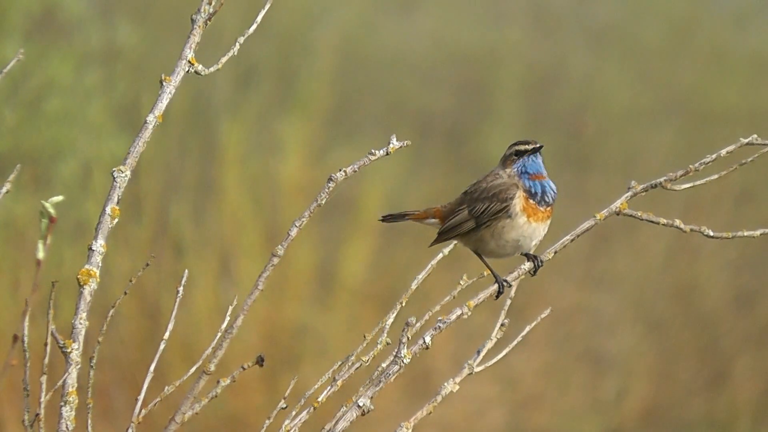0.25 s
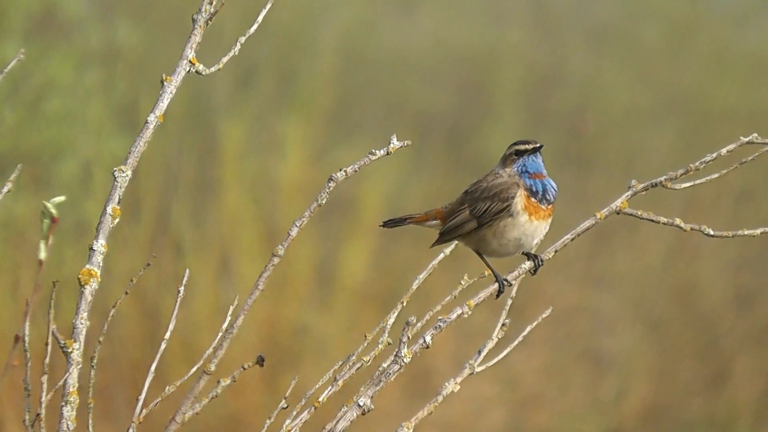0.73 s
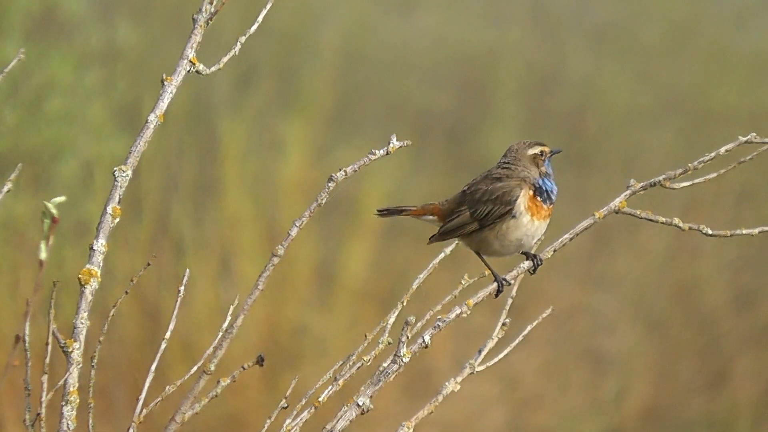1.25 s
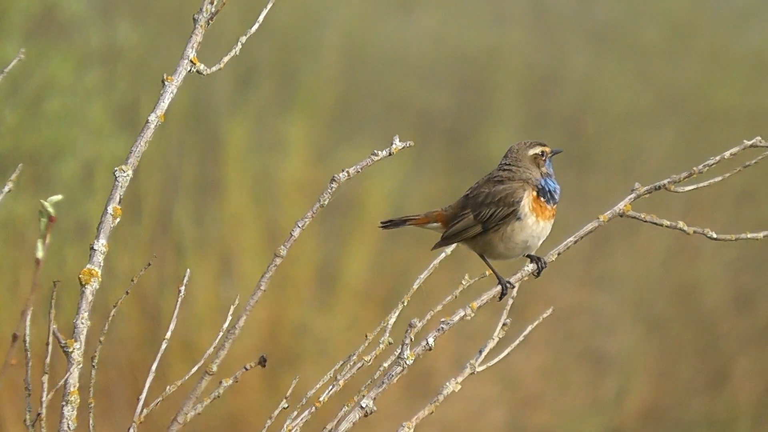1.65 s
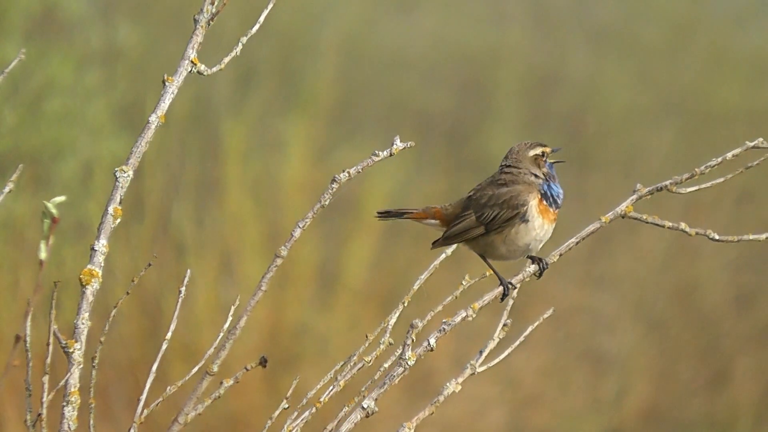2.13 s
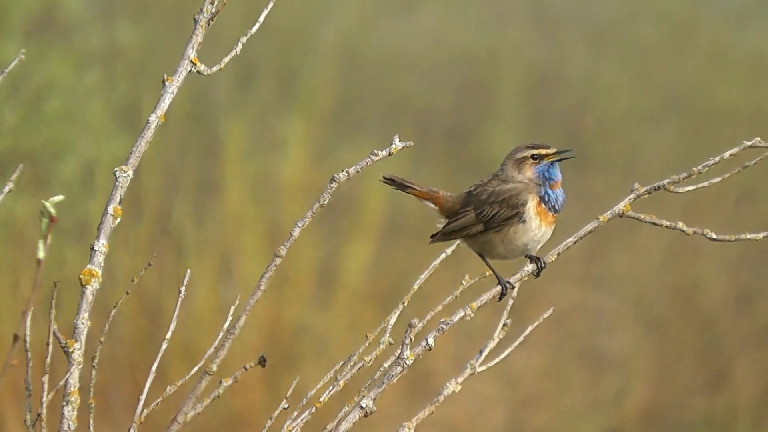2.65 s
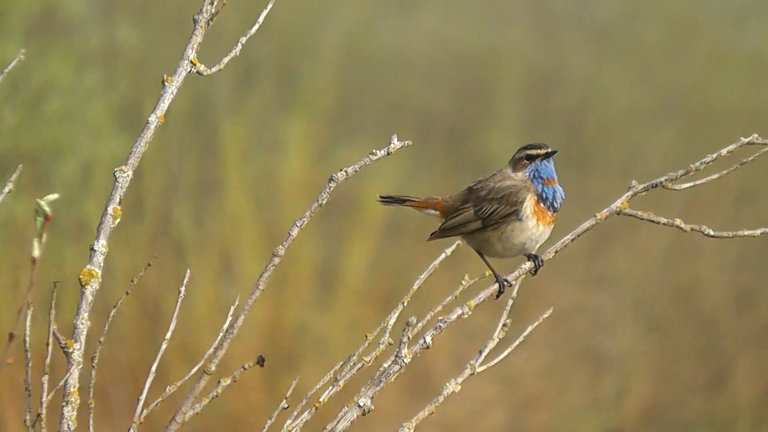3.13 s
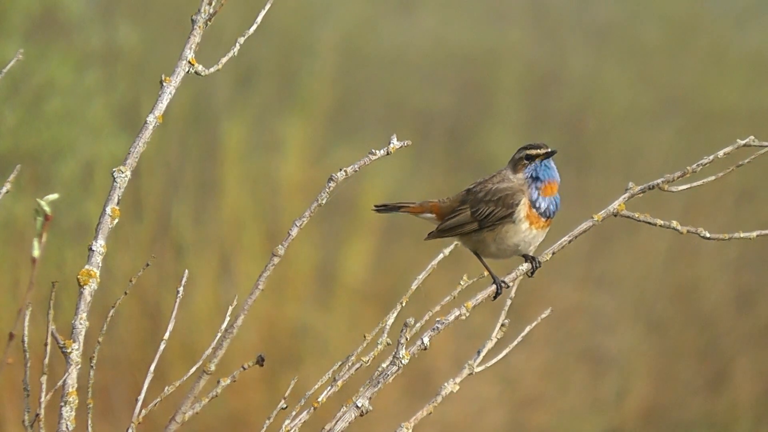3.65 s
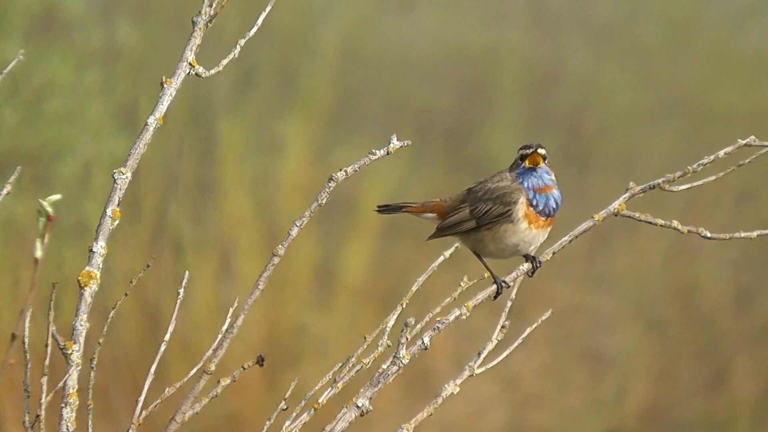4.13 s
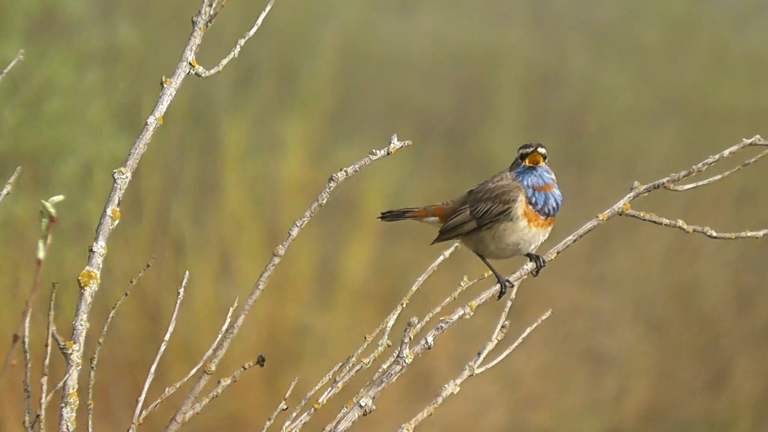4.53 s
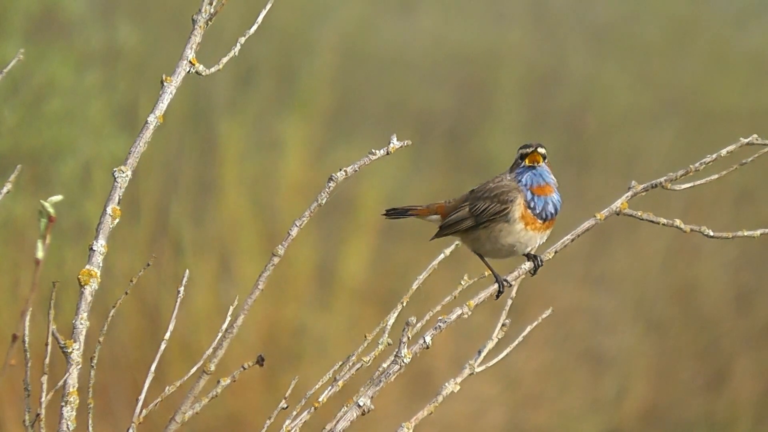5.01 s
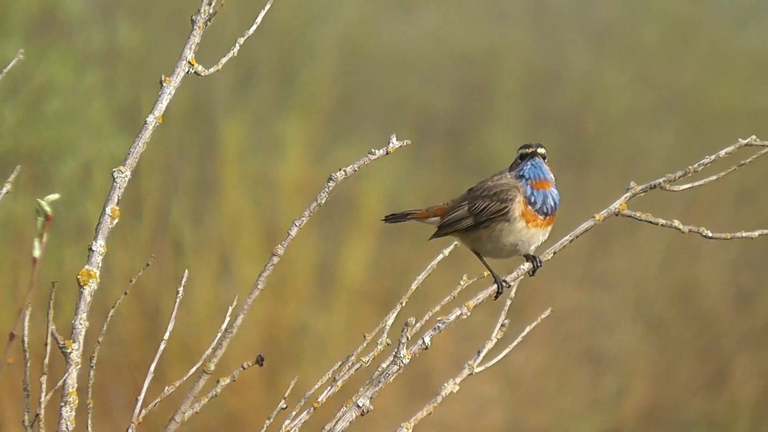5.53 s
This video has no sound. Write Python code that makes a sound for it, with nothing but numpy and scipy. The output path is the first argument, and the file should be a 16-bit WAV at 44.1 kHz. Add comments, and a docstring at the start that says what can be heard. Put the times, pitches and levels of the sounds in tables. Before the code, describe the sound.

One small bird sings a varied song of clicks, rasps, whistles and trills in open country, with a faint low rumble behind.

```python
"""Bluethroat in the reeds

A bluethroat sings from a bare twig in open reed country: ticks, nasal notes, slurs, arched whistles,
rasps and a loud fast trill, often with both sides of its syrinx at once. Steady vibration gives the
pure notes, chaotic vibration the rasps, and the scrub scatters a short echo.
Other birds call far away, over a low distant rumble, a thin machine hum and the hiss of reeds."""
import sys
import numpy as np
from scipy import signal
from scipy.fft import rfft, irfft, next_fast_len
from scipy.io import wavfile
from scipy.ndimage import uniform_filter1d, map_coordinates

SR = 44100
rng = np.random.default_rng(int(sys.argv[2]) if len(sys.argv) > 2 else 0)


def wav_out(sig):
    """Save sig, one row per channel (or a flat mono array), as 16-bit PCM at SR to the path in sys.argv[1]."""
    wavfile.write(sys.argv[1], SR, np.round(np.clip(np.atleast_2d(sig).T, -1, 1) * 32767).astype(np.int16))


N = 254456

# tone of the distant rumble and of the reeds: (frequency [Hz], relative level [dB])
RUMBLE_COLOUR = [(15, -64.5), (25, -33.5), (37, -23), (52, -11.5), (74, -1), (221, -12), (283, -11.5),
                 (323, -11), (355, -9), (824, -13.5), (889, -15), (1380, -20.5), (1870, -31.5), (2100, -31),
                 (2400, -30.5), (3120, -51.5), (5280, -120)]
REED_COLOUR = [(1500, -7), (1900, 13.5), (2200, -5.5), (3000, 2), (4500, 6.5), (6000, 3), (7500, -8),
               (11000, -10.5), (15500, -12.5)]
# stereo width of the noise bed: (frequency [Hz], left-right correlation [0-1])
BED_CORRELATION = [(60, 1), (130, 0.1), (290, 0.027), (640, 0.21), (1410, 0.083), (3100, 0.72),
                   (6820, 0.96), (15000, 0.36)]
# balance of the noise bed: (frequency [Hz], left minus right [dB])
BED_BALANCE = [(60, 7), (110, 6.5), (200, 4), (380, 3.0), (700, 0), (1290, -1.5), (2380, -3.5),
               (4400, -1.5), (8120, -0.5), (15000, -1)]
# falling calls of far birds: (start [s], length [s], first pitch [Hz], last pitch [Hz], level [dB])
FAR_FALLS = [(2.73, 0.041, 2930, 2000, -61), (2.95, 0.051, 2630, 2110, -60.5),
             (3.16, 0.059, 1614, 1326, -61.5), (3.46, 0.063, 2730, 2530, -63),
             (4.63, 0.059, 2600, 1840, -61), (4.66, 0.081, 1690, 1470, -60.5),
             (4.88, .11, 1824, 1658, -54.5), (5.048, .029, 2670, 1790, -61.5),
             (5.243, 0.062, 3110, 2330, -64.5), (5.35, 0.099, 1793, 1857, -55.5),
             (5.512, 0.021, 2760, 1680, -60), (5.595, .037, 2660, 2100, -58)]
# rolling trills of far birds: (start [s], length [s], level [dB])
FAR_TRILLS = [(3.17, 0.13, -59.5), (3.796, 0.13, -60), (4.454, 0.14, -56)]
# ring of the scrub: (frequency [Hz], time to fade by 60 dB [s])
SCRUB_DECAY = [(1500, 1), (4500, 0.28), (12000, 0.36)]
# echo send as the bird turns its head: (time [s], level [dB])
ECHO_SEND = [(0, -10), (2.3, -5), (2.8, -12), (3.8, -9.5), (4.3, -14.5), (5.7, -9)]
# soft dry ticks in quick groups: (start [s], groups, group spacing [s], ticks a group,
# tick spacing [s], band centre [Hz], first level [dB], step a group [dB], step a tick [dB])
TICK_RUNS = [(.016, 3, .11, 2, .018, 5000, -45, -2.8, 3), (.066, 3, .109, 1, 0, 4350, -49, -2.5, 0),
             (.593, 1, 0, 3, .02, 3900, -56, 0, 4.8), (.835, 1, 0, 3, .0185, 4200, -54, 0, 4.5),
             (1.17, 1, 0, 1, 0, 3450, -56, 0, 0), (1.296, 1, 0, 2, .021, 3600, -57.5, 0, 5.5),
             (1.566, 1, 0, 3, .018, 3600, -56.5, 0, 1.5), (1.837, 1, 0, 2, .02, 3600, -57, 0, 1.5),
             (2.347, 2, .064, 2, .019, 4300, -54, 5, 2), (2.475, 8, .0633, 2, .023, 4650, -46, -.3, 1.8)]
# dry broad clicks: (time [s], relative level [dB])
CLICKS = [(3.9915, -35.5), (3.9937, -39.5), (4.419, -39.5), (4.645, -38.5), (4.6718, -40.5), (4.699, -41.5),
          (5.552, -33.5), (5.5541, -31.5)]
# tone of the clicks and of the rasps: (frequency [Hz], relative level [dB])
CLICK_COLOUR = [(1500, -16), (2600, -10.5), (4600, 5), (6500, -4.5), (8000, -24), (15000, -34.5)]
RASP_COLOUR = [(1180, -39), (2000, -38), (2520, -16), (2790, -47), (2990, -23), (3550, -4.5), (4110, -4.5),
               (4590, 9.5), (6410, -2.5), (7610, -17), (15500, -45)]
# hissing rasps: (start [s], length [s], level [dB], crest position [0-1])
RASPS = [(0.354, 0.078, -50, 0.76), (0.449, .038, -49.5, 0.6), (0.602, .24, -53, 0.45),
         (0.858, .15, -49.5, .4), (1.86, 0.08, -56, 0.6), (3.593, 0.5, -53, 0.48), (4.206, 0.15, -49, 0.48),
         (4.439, 0.22, -44.5, 0.35), (4.705, .19, -42, 0.53), (4.866, 0.021, -39.5, .8)]
# sharp vocal snaps: (peak time [s], nominal pitch [Hz], level [dB])
SNAPS = [(4.279, 4630, -33.5), (4.2985, 4680, -26), (4.311, 4460, -29), (4.512, 4350, -32.5),
         (4.5177, 4300, -30.5), (4.528, 4530, -29.5), (4.545, 4630, -28), (4.577, 4920, -28),
         (4.78, 4400, -29.5), (4.832, 4670, -29.5), (4.845, 4920, -24.5)]
# nasal notes: (start [s], length [s], first pitch [Hz], last pitch [Hz], resonance [Hz], level [dB])
NASALS = [(0.342, .082, 765, 790, 5800, -56.5), (0.627, 0.078, 1166, 1087, 6400, -56.5),
          (0.702, 0.077, 1162, 1118, 5700, -53.5), (1.016, 0.026, 805, 658, 4900, -43),
          (2.073, 0.029, 645, 543, 3570, -53.5), (2.217, 0.046, 785, 572, 3970, -53.5),
          (4.056, 0.14, 395, 437, 3300, -56)]
# arching runs of peeps: (first peep [s], peeps, spacing [s], top pitch [Hz], top level [dB])
PEEP_RUNS = [(1.349, 5, .0335, 5020, -43.5), (1.633, 3, .0335, 4780, -46), (1.887, 3, .029, 5250, -45.5),
             (3.34, 4, .042, 5150, -51.5), (4.024, 2, .027, 5300, -50.5)]
# pure slurs: (start [s], length [s], first pitch [Hz], middle pitch [Hz], last pitch [Hz],
# level [dB], crest position [0-1])
SLURS = [(.637, 0.077, 4930, 4520, 4530, -45.5, 0), (.78, .1, 2680, 3010, 3580, -55, 1),
         (1.022, .034, 3940, 3505, 2630, -51, 0.6), (2.98, 0.091, 7200, 6350, 6060, -52.5, 0.48),
         (4.235, .079, 2850, 3550, 3380, -49, 0.64), (4.44, .075, 3700, 3270, 3620, -52, 0.5)]
# a rise, a dive and a flick: columns as in SLURS, start and level relative to each twitter
TWITTER_NOTES = [(0, 0.0327, 4280, 4570, 4680, -2.5, 0.77), (.025, 0.031, 6170, 4900, 4190, 0, .4),
                 (.056, .015, 2650, 3950, 3450, -5, .65)]
# twitter cues: (start [s], level [dB])
TWITTERS = [(4.396, -40.5), (4.529, -38.5)]
# high notes that hold, then plunge: (start [s], length [s], first pitch [Hz], last pitch [Hz], level [dB])
PLUNGES = [(2.078, 0.098, 6560, 5110, -47.5), (2.213, 0.086, 6220, 4320, -42.5),
           (2.315, .056, 6300, 4350, -42), (2.406, 0.061, 6450, 4300, -41)]
# wide warbles that end in a slide: (start [s], level [dB])
ZIGZAGS = [(3.615, -49), (3.683, -49), (3.748, -44.5), (3.818, -43.5), (3.885, -44)]
# arched whistles: (crest time [s], crest pitch [Hz], level [dB])
ARCHES = [(2.638, 4850, -34), (2.836, 4866, -28), (3.531, 4850, -26.5), (3.736, 4785, -27)]
# the chip before the loud trill and the flourish after it: (time [s], pitch [Hz], level [dB])
CHIP = [(4.87, 2740, -70.5), (4.878, 3584, -29.5), (4.884, 3690, -23), (4.889, 3580, -25.5),
        (4.896, 3330, -31), (4.906, 3185, -35.5), (4.916, 2490, -55)]
FLOURISH = [(5.353, 4246, -26), (5.369, 3768, -43), (5.379, 3878, -33), (5.389, 4243, -25),
            (5.401, 4489, -25), (5.417, 4669, -23), (5.425, 4620, -25), (5.435, 4372, -40)]
# the thin rising trill: (time [s], centre pitch [Hz], sweep scale [Hz], level [dB])
RISING_TRILL = [(.861, 3710, 1180, -62), (.885, 4235, 1280, -41.5), (.915, 4900, 1400, -41.5),
                (.963, 5760, 1400, -45.5), (1.043, 6720, 1000, -51), (1.12, 6690, 800, -53.5),
                (1.168, 6900, 500, -56), (1.21, 7000, 400, -75)]
# the falling buzz and the loud trill:
# (time [s], centre pitch [Hz], sweep scale [Hz], level [dB], rate [sweeps/s])
FALLING_BUZZ = [(3.047, 6100, 605, -50, 92), (3.075, 6000, 1690, -49.5, 87), (3.128, 6100, 1760, -52, 95),
                (3.137, 5160, 870, -36, 184), (3.155, 4910, 1180, -39, 300), (3.172, 4500, 910, -44.5, 180),
                (3.185, 4560, 700, -67, 245)]
LOUD_TRILL = [(4.9863, 4220, 600, -33, 96), (5.02, 4130, 1650, -33, 106), (5.07, 4340, 1950, -26, 87),
              (5.12, 4460, 1780, -23, 88.5), (5.19, 4400, 1600, -24, 96), (5.27, 4420, 1420, -22.3, 97.5),
              (5.357, 4400, 1120, -23.5, 94.5)]


def amp(db):
    return 10 ** (np.asarray(db) / 20)


def unit_rms(x):
    return x / np.sqrt(np.mean(x ** 2) + 1e-20)


def curve_at(points, hz):
    """Read (frequency, value) points on a log frequency axis."""
    knots, values = np.transpose(points)
    return np.interp(np.log(hz + 1), np.log(knots + 1), values)


def contour(rows):
    """Turn breakpoints into sample times and one curve a column."""
    times, *columns = np.transpose(rows)
    t = np.arange(times.min(), times.max(), 1 / SR)
    return [t] + [np.interp(t, times, column) for column in columns]


def progress(length):
    """A ramp from 0 to 1 through a note."""
    return np.linspace(0, 1, max(int(length * SR), 16))


def swell(u, crest):
    """A rounded rise and fall that peaks at the crest position."""
    return np.sin(np.pi * np.interp(u, [0, np.clip(crest, .05, .95), 1], [0, .5, 1])).clip(0) ** 1.33


def wobble(size, rate):
    """Smooth random modulation, rate knots a second."""
    knots = rng.standard_normal(size + 4)[:int(size * rate / SR) + 4]
    return map_coordinates(knots, [np.arange(size) * rate / SR], mode='nearest')


def filtered(x, response):
    """Shape x with a frequency response."""
    size = next_fast_len(N + SR // 2)
    return irfft(rfft(x, size) * response(np.fft.rfftfreq(size, 1 / SR)), size)[..., :N]


def delayed(x, seconds):
    return filtered(x, lambda hz: np.exp(-2j * np.pi * hz * seconds))


def add(track, start, sound):
    """Lay a sound into a track."""
    i = round(start * SR)
    sound = sound[max(-i, 0):max(N - i, 0)]
    track[max(i, 0):max(i, 0) + len(sound)] += sound


def stereo_noise(colour):
    """Coloured noise of rms 1, partly alike in the two ears."""
    def mid_side(hz):
        angle = np.arccos(np.clip(curve_at(BED_CORRELATION, hz), -1, 1)) / 2
        return amp(curve_at(colour, hz)) * [np.cos(angle), np.sin(angle)]
    mid, side = filtered(rng.standard_normal((2, N)), mid_side)
    ears = np.array([mid + side, mid - side])
    return unit_rms(filtered(ears, lambda hz: amp(curve_at(BED_BALANCE, hz) * [[.5], [-.5]])))


def rumble(surge_at_s=.71, surge_width_s=.082, surge_db=8):
    """A far rumble whose bass heaves gently and surges once."""
    bed = amp(-51.5) * stereo_noise(RUMBLE_COLOUR)
    bass = filtered(bed, lambda hz: 1 / (1 + (hz / 170) ** 4))
    surge = np.exp(-((np.arange(N) / SR - surge_at_s) / surge_width_s) ** 2)
    heave_db = wobble(N, 10) + surge_db * surge
    return bed + bass * (amp(heave_db) - 1)


def machine_hum(hum_hz=842, drone_hz=79):
    """A thin hum over a low drone, both drifting in pitch."""
    def tone(hz, drift):
        return np.sin(2 * np.pi * np.cumsum(hz * (1 + drift * wobble(N, 5))) / SR)
    return amp(-67.5) * tone(hum_hz, .00296) + amp(-63.5) * tone(drone_hz, .031)


def reeds():
    """The soft, slightly wavering hiss of reeds."""
    return amp(-62 + .5 * wobble(N, 7)) * stereo_noise(REED_COLOUR)


def chorus(quietest_db=-68, count=40):
    """The farthest songbirds: a scatter of faint slurs."""
    when, size, pitch, bend, loud = rng.random((count, 5)).T
    start, length = when * N / SR, .04 + .2 * size
    hz, slide = 2800 + 3000 * pitch, .23 * (bend - .8)
    db = quietest_db + 5 * loud
    return slurs(np.column_stack([start, length, hz * (1 - slide), hz, hz * (1 + slide), db, bend]))


def far_birds(trill_hz=1780, pulses_per_s=32):
    """Faint falling notes and low rolling trills from across the marsh."""
    out = falls(FAR_FALLS, bend=1.48, crest=.51, second_db=-39)
    for start, length, db in FAR_TRILLS:
        u = progress(length)
        pulse = np.sin(np.pi * pulses_per_s * length * u) ** 2
        tone = syrinx(trill_hz * (1 + .1308 * (pulse - .8)), jitter=.033)
        add(out, start, amp(db) * swell(u, .74) ** .5 * pulse * tone)
    return out


def scrub(x, width):
    """Twigs and reeds scatter a diffuse tail; width 0 is mono, 1 fully wide."""
    hz, t, noise = signal.stft(rng.standard_normal((2, SR // 2)), SR, nperseg=256)
    decay = amp(-60 * t / curve_at(SCRUB_DECAY, hz)[:, None])
    mid, side = signal.istft(noise * decay, SR, nperseg=256)[1]
    tail = np.array([mid + width * side, mid - width * side])
    return signal.fftconvolve(x[None], tail / np.linalg.norm(tail[0]), axes=1)[:, :N]


def ticks(band_width_hz=930, puff_width_s=.0038):
    """Brief puffs of noise coloured by the throat; each group tends to grow louder."""
    out, t = np.zeros(N), np.arange(-SR // 64, SR // 64) / SR
    hz = np.fft.rfftfreq(len(t), 1 / SR)
    envelope = np.exp(-(t / puff_width_s) ** 2)
    for start, groups, group_s, count, tick_s, centre_hz, first_db, group_db, tick_db in TICK_RUNS:
        throat = np.exp(-.5 * ((hz - centre_hz) / band_width_hz) ** 2)
        for group, tick in np.ndindex(round(groups), round(count)):
            puff = unit_rms(irfft(rfft(rng.standard_normal(len(t))) * throat, len(t)))
            db = first_db + group * group_db + tick * tick_db + rng.normal(0, 1)
            add(out, start + group * group_s + tick * tick_s + t[0], amp(db) * puff * envelope)
    return out


def clicks(decay_s=.0018):
    """Instant cracks that die within a few milliseconds."""
    out, t = np.zeros(N), np.arange(SR // 80) / SR
    for start, db in CLICKS:
        add(out, start, amp(db + 6) * np.exp(-t / decay_s) * rng.standard_normal(len(t)))
    return filtered(out, lambda hz: amp(curve_at(CLICK_COLOUR, hz)))


def rasps():
    """Chaotic vibration: a crackling hiss in the throat's band."""
    effort = np.zeros(N)
    for start, length, db, crest in RASPS:
        add(effort, start, amp(db) * swell(progress(length), crest))
    crackle = rng.standard_normal(N) * amp(2.2 * wobble(N, 700))
    return effort * unit_rms(filtered(crackle, lambda hz: amp(curve_at(RASP_COLOUR, hz))))


def snaps(attack_s=.0007, drop_s=.00046):
    """The syrinx pops open: a few cycles that drop steeply in pitch, with a faint crack."""
    out, t = np.zeros(N), np.arange(SR // 100) / SR
    envelope = (t / attack_s * np.exp(1 - t / attack_s)) ** 2
    for peak_s, hz, db in SNAPS:
        pitch = hz * (.925 + .48 * np.exp(-t / drop_s))
        tone = np.sqrt(2) * np.sin(2 * np.pi * np.cumsum(pitch) / SR)
        crack = .055 * rng.standard_normal(len(t))
        add(out, peak_s - attack_s, amp(db) * envelope * (tone + crack))
    return out


def nasals():
    """A low buzzing pitch, heard only through the overtones near the throat resonance."""
    out, harmonics = np.zeros(N), np.arange(2, 14)[:, None]
    for start, length, first, last, throat_hz, db in NASALS:
        u = progress(length)
        pitch = (first + (last - first) * u ** 2) * (1 + .011 * wobble(len(u), 897))
        hz = harmonics * pitch
        throat = 1 / (1 + ((hz - throat_hz) / 500) ** 2) ** .6
        band = 1 / (1 + (hz / 6900) ** 20) / (1 + (3100 / hz) ** 10)
        overtones = np.sin(2 * np.pi * np.cumsum(hz, axis=1) / SR)
        voice = unit_rms((throat * band * overtones).sum(0))
        add(out, start, amp(db + 3.4 * wobble(len(u), 410)) * swell(u, .59) ** .34 * voice)
    return out


def peeps(fourth_db=-11, edge_db=-5.5, edge_pitch_ratio=.9):
    """Tiny hoarse arches: the third and fourth harmonics of an unsteady pitch, wrapped in rasp."""
    out, u = np.zeros(N), progress(.027)
    throat = signal.butter(3, [3500, 6000], 'bandpass', fs=SR, output='sos')
    for first_s, count, spacing, top_hz, top_db in PEEP_RUNS:
        for k in range(round(count)):
            edge = ((2 * k + 1) / round(count) - 1) ** 2  # 0 mid-run, towards 1 at its ends
            hz = top_hz * edge_pitch_ratio ** edge * (1 + rng.normal(0, .0158))
            db = top_db + edge_db * edge + rng.normal(0, 1)
            fundamental = hz / 3 * (1 - .1 * (2 * u - 1) ** 2 + .025 * wobble(len(u), 1500))
            third, fourth = np.sin(np.outer([3, 4], 2 * np.pi * np.cumsum(fundamental) / SR))
            hoarseness = 1 + .35 * wobble(len(u), 900)
            rasp = .32 * unit_rms(signal.sosfilt(throat, rng.standard_normal(len(u))))
            voice = hoarseness * (third + amp(fourth_db) * fourth + rasp)
            add(out, first_s + k * spacing - len(u) / SR / 2, amp(db) * swell(u, .37) * voice)
    return out


def syrinx(hz, jitter, second_db=-39, third_db=-40):
    """A nearly pure tone; the pitch trembles and two faint overtones leak through the throat."""
    hz = uniform_filter1d(hz, size=48) * (1 + jitter * wobble(len(hz), 900))
    phase = 2 * np.pi * np.cumsum(hz) / SR
    second, third = np.sin(2 * phase), (hz < SR / 6) * np.sin(3 * phase)
    leak = amp(5.8 * wobble(len(hz), 68))  # the gape of the bill keeps changing
    return np.sqrt(2) * (np.sin(phase) + leak * (amp(second_db) * second + amp(third_db) * third))


def slurs(notes):
    """Each note bends smoothly through three pitches."""
    out = np.zeros(N)
    for start, length, first, middle, last, db, crest in notes:
        u = progress(length)
        hz = first + (last - first) * u + 2 * (2 * middle - first - last) * u * (1 - u)
        add(out, start, amp(db) * swell(u, crest) * syrinx(hz, jitter=.016))
    return out


def twitters():
    """The same three quick notes, sung twice."""
    return sum(amp(db) * delayed(slurs(TWITTER_NOTES), start) for start, db in TWITTERS)


def falls(notes, bend, crest, second_db):
    """Each note leaves its first pitch slowly, then ever faster; more bend means a later drop."""
    out = np.zeros(N)
    for start, length, first, last, db in notes:
        u = progress(length)
        tone = syrinx(first + (last - first) * u ** bend, jitter=.0092, second_db=second_db, third_db=-52)
        add(out, start, amp(db) * swell(u, crest) * tone)
    return out


def zigzags(warble_s=.04, slide_s=.033, swings_per_s=74, depth_hz=684):
    """The pitch swings widely about a sagging centre, then slides away from the last trough."""
    out, u = np.zeros(N), progress(warble_s + slide_s)
    t = u * (warble_s + slide_s)
    warble_t = np.minimum(t, warble_s)
    centre_hz = 4980 - 9200 * warble_t - 36000 * (t - warble_t)  # slow sag, then steep slide
    hz = centre_hz - depth_hz * np.cos(2 * np.pi * swings_per_s * warble_t)
    for start, db in ZIGZAGS:
        level = amp(db + 1.5 * wobble(len(t), 150)) * swell(u, .5) ** .7
        add(out, start, level * syrinx(hz, jitter=.016, second_db=-42, third_db=-44))
    return out


def arches(length_s=.11, rise_s=.036, fall_s=.025, foot_pitch_ratio=.764, foot_db=-17.5, lag_s=.0016):
    """One push of effort lifts the pitch and lets it go; loudness follows just behind."""
    def push(t):
        return np.exp(-(t / np.where(t < 0, rise_s, fall_s)) ** 2)
    out, t = np.zeros(N), (progress(length_s) - .5) * length_s
    for crest_s, crest_hz, db in ARCHES:
        hz = crest_hz * (foot_pitch_ratio + (1 - foot_pitch_ratio) * push(t))
        tone = syrinx(hz, jitter=.0015, second_db=-39.5, third_db=-43)
        level = amp(db + foot_db * (1 - push(t - lag_s)) + 1.2 * wobble(len(t), 140))
        add(out, crest_s + t[0], level * signal.windows.tukey(len(t), .22) * tone)
    return out


def chip_and_flourish():
    """Two clean gliding whistles that frame the loud trill."""
    out = np.zeros(N)
    for note in CHIP, FLOURISH:
        t, hz, db = contour(note)
        tone = syrinx(hz, jitter=.004, second_db=-41, third_db=-38)
        add(out, t[0], amp(db) * signal.windows.tukey(len(t), .08) * tone)
    return out


def trill(t, centre_hz, sweep_scale_hz, db, rate, open_share, shut_db, jitter):
    """The pitch falls while the syrinx is open and flies back while it is almost shut."""
    out = np.zeros(N)
    cycles = np.cumsum(rate * np.ones(len(t))) / SR + .04 * wobble(len(t), 50)
    u = cycles % 1 - .5  # -0.5 to 0.5 through each sweep
    opening = np.exp(-np.abs(2 * (u - .02) / open_share) ** 3) * amp(-8 * u)  # starts hard, eases off
    sweep = np.interp(u, [-.5, -.36, .4, .5], [0, .36, -.4, 0])
    level = amp(db + .4 * wobble(len(t), 81)) * (opening + amp(shut_db))
    tone = syrinx(centre_hz + sweep_scale_hz * sweep, jitter, second_db=-44, third_db=-44.5)
    add(out, t[0], level * signal.windows.tukey(len(t), .03) * tone)
    return out


def trills():
    """The loud closing trill of short steep sweeps, a thin rising trill and a falling buzz."""
    loud = trill(*contour(LOUD_TRILL), open_share=.42, shut_db=-30, jitter=.014)
    rising = trill(*contour(RISING_TRILL), rate=64, open_share=.72, shut_db=-23, jitter=.02)
    buzz = trill(*contour(FALLING_BUZZ), open_share=.85, shut_db=-21, jitter=.012)
    return loud + rising + buzz


def scene():
    """The song up front and centred, its echoes around it, far birds and the noise bed behind."""
    pure_notes = slurs(SLURS) + falls(PLUNGES, bend=2.8, crest=.78, second_db=-33)
    pure_notes += arches() + zigzags() + twitters() + chip_and_flourish()
    song = pure_notes + trills() + peeps() + nasals() + ticks() + snaps() + clicks() + rasps()
    ground_bounce = amp(-14.5) * delayed(song, .0038)
    send_db = np.interp(np.arange(N) / SR, *np.transpose(ECHO_SEND))
    off_axis = song * amp(send_db)  # what the bill sends away from the listener
    bush_echo = amp(-15.5) * delayed(off_axis, .057)
    far = far_birds() + chorus()
    pan_right = amp([[-1.5], [1.5]])
    marsh = (amp(1) * far + amp(-1.5) * scrub(far, width=1)) * pan_right
    echoes = ground_bounce + bush_echo + scrub(off_axis, width=.28)
    return song + echoes + marsh + rumble() + machine_hum() + reeds()


def record(dry, top_hz=15800):
    """A brick-wall low-pass trims the very top."""
    return filtered(dry, lambda hz: hz < top_hz)


dry = scene()
out = record(dry)
wav_out(out)
```